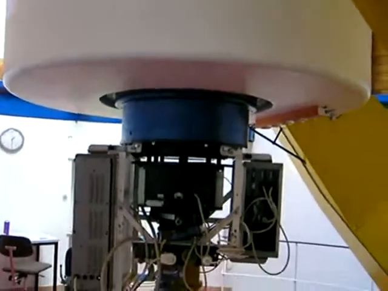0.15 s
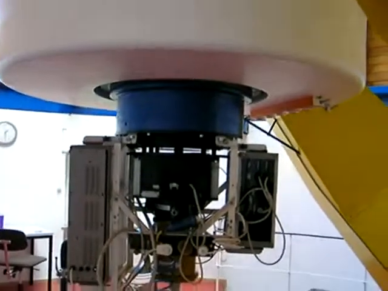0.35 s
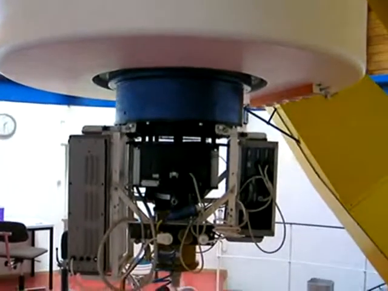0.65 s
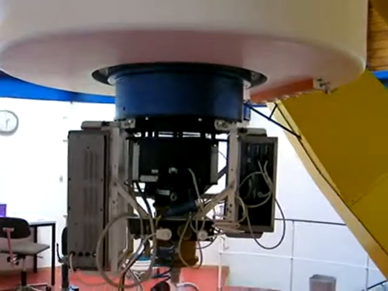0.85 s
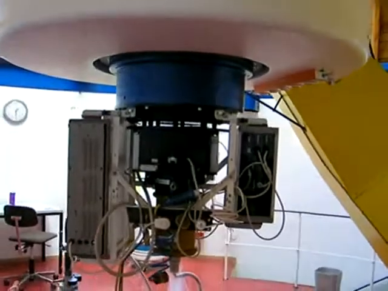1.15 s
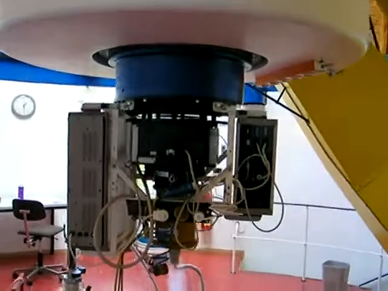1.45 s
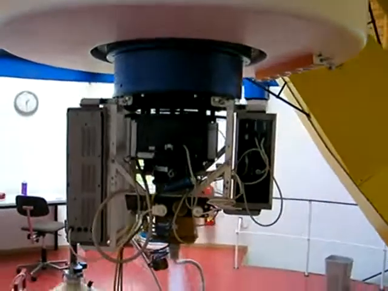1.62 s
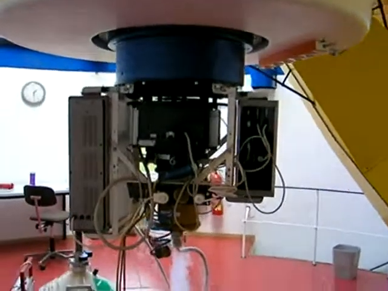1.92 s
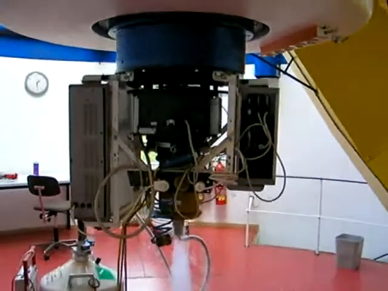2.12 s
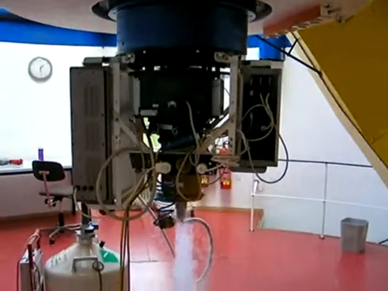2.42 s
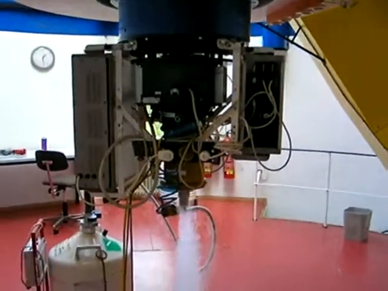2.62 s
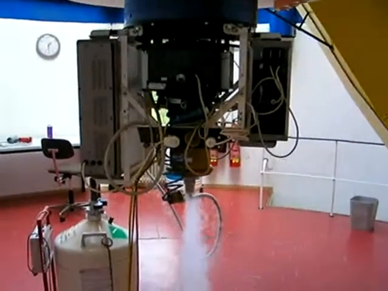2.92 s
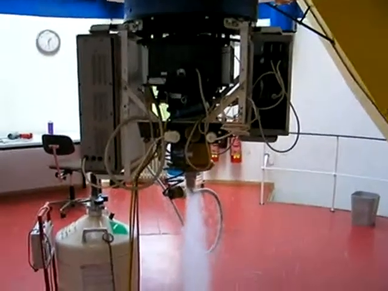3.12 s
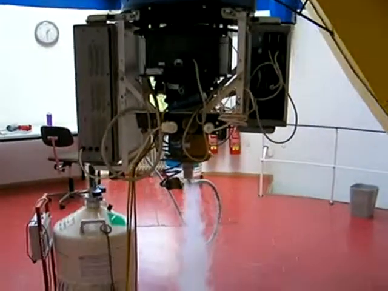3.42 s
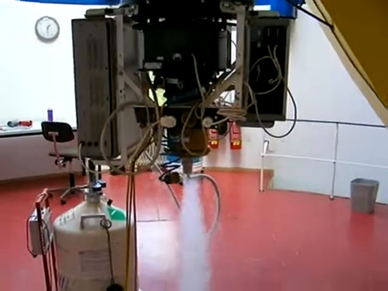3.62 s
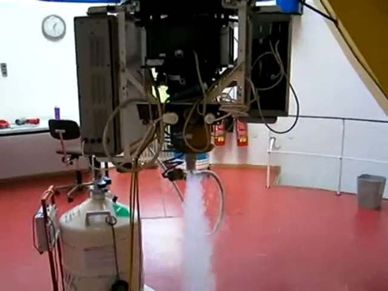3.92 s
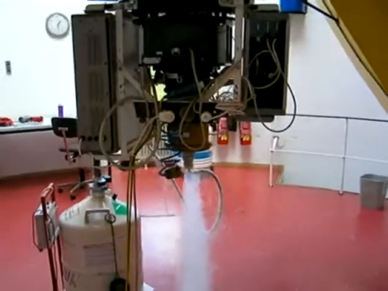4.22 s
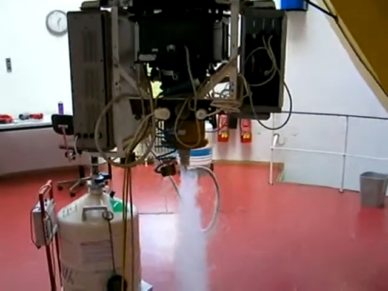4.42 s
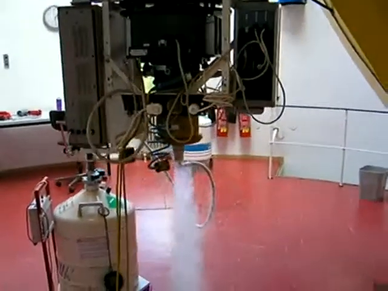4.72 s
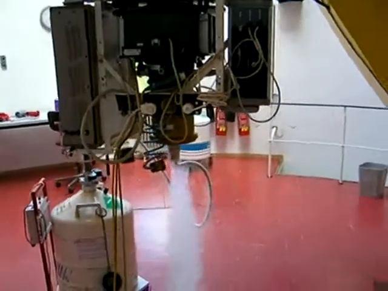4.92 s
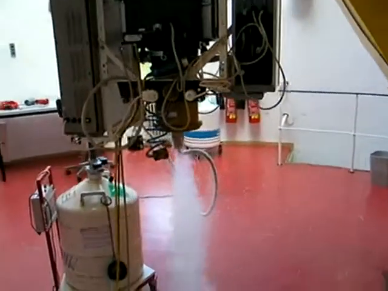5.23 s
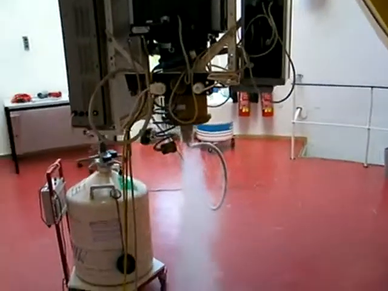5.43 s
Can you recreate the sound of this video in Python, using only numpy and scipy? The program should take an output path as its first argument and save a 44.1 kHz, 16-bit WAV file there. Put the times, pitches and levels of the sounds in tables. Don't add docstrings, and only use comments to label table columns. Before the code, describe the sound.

Constant turbulent vapour jet, mid-bright and slightly whistling, swelling and easing several times without stopping. Underneath are a faint low hum, motor whine and a quick regular pump knock that fades in and out as the microphone tilts. A short spray burst comes early and two soft handling bumps near the middle. Indoor hall, single microphone, identical channels, muffled treble with patchy holes.

```python
import sys
import numpy as np
from scipy import signal
from scipy.fft import irfft
from scipy.io import wavfile

SR = 44100
rng = np.random.default_rng(int(sys.argv[2]) if len(sys.argv) > 2 else 0)


def decibels_to_gain(level_db):
    exponent = np.asarray(level_db, float) / 20
    return 10 ** exponent


def master_out(mix):
    frames = np.transpose(np.atleast_2d(mix))
    ceiling = np.clip(frames, -1, 1)
    pcm = np.round(ceiling * 32767).astype(np.int16)
    wavfile.write(sys.argv[1], SR, pcm)


N = 245107

# [t/s, level/dB]
FLOW = [(0, -39), (.1, -34), (.21, -38.5), (.36, -31.5), (.65, -36.5), (.95, -31), (1.14, -38.5),
        (1.27, -34), (1.75, -38), (1.92, -32.5), (2.07, -40), (2.5, -31), (2.84, -35.5), (3.85, -34),
        (4.0, -38), (4.17, -32), (4.5, -34), (5.1, -34), ]
# [f/Hz, density/dB per Hz]
HISS_SPECTRUM = [(250, -9.5), (900, -3.5), (1900, -6), (2500, -0.5), (3300, -14.5), (4000, 7.5),
                 (4800, -19.5), (6000, -12)]
# [f/Hz, width/Hz, level/dB]
PIPE_MODES = [(769.6, 130, -43), (1736, 50, -50), (2046, 56, -49), (2696, 170, -43.5), (7880, 22, -66.5)]
# [f/Hz, level over flow/dB, share of flow swing, rise as the vent comes into view/dB per s]
WHISTLES = [(2306, -3.5, 0.94, -0.4), (2523, -5, 1.7, -0.67), (3035, -7.5, 0.038, 1.1)]
WHISTLE_WIDTHS_HZ = [105, 75, 95]
# [f/Hz, density/dB per Hz]
SPRAY_SPECTRUM = [(4000, -15.5), (5200, 4), (5800, 3.5), (6300, 10.5), (7600, 5), (8700, -0.5)]
# [order of stroke rate, level/dB rms]
PUMP_ORDERS = [(98, -47.5), (99, -55), (168, -59), (209, -52), (212, -52), (213, -49), (214, -48),
               (223, -49), (224, -53), (230, -54), (272, -55), (301, -56), (329, -55), (336, -54)]
# [t/s, level/dB]
FACING = [
    (0, -1),
    (1, -10),
    (1.6, 0),
    (2.5, 0),
    (3.5, 0.5),
    (4.1, -3),
    (4.6, 4),
    (5.56, -7),
]
# [order, lower side level/dB, centre level/dB, upper side level/dB]
FAN_ORDERS = [(4, -69, -44.5, -65), (6, -57, -72, -64), (7, -53, -74, -53), (8, -62, -75, -55),
              (9, -50, -72, -48), (12, -65, -67, -58), (16, -59, -69, -62)]
# [f/Hz, level/dB rms]
MOTOR_TONES = [(310.45, -61), (391.19, -58), (520.87, -51), (570.4, -53), (620.86, -51), (678.93, -62),
               (719, -60), (720.86, -60), (752.34, -53), (861.7, -57)]
# [t/s, peak level/dB]
HAND_BUMPS = [
    (2.48, -35),
    (3.01, -40),
]
# [f/Hz, step/dB]
STEP_SPECTRUM = [(250, -30), (400, -35), (1800, -25), (3400, -28), (4000, -31), (5750, -27.5), (6400, -30),
                 (8300, -30.5)]
BAND_EDGES = [4, 8, 12, 16, 20, 24, 30, 36, 44, 52, 62, 74, 90, 110, 134, 162, 196]

IN_STEP_S = 4.1


def rms_one(x):
    return x / np.sqrt(np.mean(x ** 2) + 1e-20)


def at_hz(points, hz):
    f_hz, db = np.array(points)[:, 0], np.array(points)[:, 1]
    return np.interp(np.log(hz), np.log(f_hz), db)


def in_time(rows):
    s, *columns = np.transpose(rows)
    return [np.interp(np.arange(N) / SR, s, c) for c in columns]


def drift(rate_hz):
    r = np.exp(-80 * np.pi * rate_hz / SR)
    draws = rng.standard_normal(N // 40 + 2002)
    slow = signal.lfilter([1], [1, -2 * r, r * r], draws)[2000:]
    return np.interp(np.arange(N) / 40, np.arange(len(slow)), rms_one(slow))


def resonant_noise(hz, width_hz):
    r = np.exp(-np.pi * width_hz / SR)
    section = [1, 0, -1, 1, -2 * r * np.cos(2 * np.pi * hz / SR), r * r]
    return rms_one(signal.sosfilt([section, section], rng.standard_normal(N)))


def banded_noise(spectrum, patchy_db, rate_hz):
    low_hz, high_hz = spectrum[0][0], spectrum[-1][0]
    edges = low_hz * 2 ** np.arange(0, np.log2(high_hz / low_hz) + .3, 1 / 3)
    white = rng.standard_normal((2, N))
    together = drift(rate_hz / 4)
    out = 0
    for k, (low, high) in enumerate(zip(edges, edges[1:])):
        bandpass = signal.butter(2, [low, high], "band", fs=SR, output="sos")
        band = signal.sosfilt(bandpass, white[k % 2])
        flicker_db = patchy_db * (0.39 * together + drift(rate_hz))
        out = out + decibels_to_gain(at_hz(spectrum, np.sqrt(low * high)) + flicker_db) * band
    return rms_one(out)


def whistle(hz, width_hz, order=2):
    low = signal.butter(order, width_hz / 2, fs=SR, output="sos")
    real, imaginary = signal.sosfilt(low, rng.standard_normal((2, N)))
    carrier = np.exp(2j * np.pi * np.cumsum(hz) / SR)
    return rms_one(np.real((real + 1j * imaginary) * carrier))


def tones(hz, db, turns):
    t = np.arange(N) / SR
    return sum(np.sqrt(2) * decibels_to_gain(d) * np.cos(2 * np.pi * (f * t + p)) for f, d, p in zip(hz, db, turns))


def spray():
    surge_s, attack_s, decay_s, surge_db = 1.85, .015, .13, 9.5
    t = np.arange(N) / SR
    surge = np.exp(np.where(t < surge_s, (t - surge_s) / attack_s, (surge_s - t) / decay_s))
    return decibels_to_gain(-47 + surge_db * surge) * banded_noise(SPRAY_SPECTRUM, patchy_db=.4, rate_hz=25.0)


def jet():
    wander_hz, flutter_db = 26, 1.5
    t = np.arange(N) / SR
    flow_db, = in_time(FLOW)
    swing_db = flow_db - flow_db.mean()
    out = decibels_to_gain(-35.5) * banded_noise(HISS_SPECTRUM, patchy_db=1.0, rate_hz=21.0)
    out += sum(decibels_to_gain(db) * resonant_noise(hz, width_hz) for hz, width_hz, db in PIPE_MODES)
    for (hz, db, follows, db_per_s), width_hz in zip(WHISTLES, WHISTLE_WIDTHS_HZ):
        level_db = flow_db.mean() + db + follows * swing_db + db_per_s * (t - t.mean())
        level_db = level_db + flutter_db * drift(4.7)
        out += decibels_to_gain(level_db) * whistle(hz + wander_hz * drift(1.5), width_hz)
    ridge_hz = 4228 + 25 * t
    out += decibels_to_gain(-46) * whistle(ridge_hz, width_hz=300, order=4)
    return out + spray()


def pump(facing_db):
    stroke_hz, stroke_s = 3.5367, .224
    casing_hz, casing_width_hz, casing_db, casing_scatter_db = 775, 110, -64, 3
    weak_level_db, weak_scatter_db = -75.5, 4
    strong, strong_db = np.transpose(PUMP_ORDERS)
    others = np.setdiff1d(np.arange(160, 340), strong)
    off = 2 * (others * stroke_hz - casing_hz) / casing_width_hz
    scatter_db = casing_scatter_db * rng.standard_normal(len(others))
    others_db = casing_db - 10 * np.log10(1 + off ** 2) + scatter_db
    order, db = np.append(strong, others), np.append(strong_db, others_db)
    smear = np.cumsum(.1 * rng.standard_normal(500))[order.astype(int)]
    hz = order * stroke_hz
    low = hz < 360
    hum = tones(hz[low], db[low], -hz[low] * IN_STEP_S)
    knock = tones(hz[~low], db[~low], (smear - hz * stroke_s)[~low])
    weak = np.zeros(N // 2 + 1, complex)
    bins = np.round(np.arange(105, 500) * stroke_hz * N / SR).astype(int)
    weak_db = weak_level_db + weak_scatter_db * np.minimum(rng.standard_normal(len(bins)), 1.5)
    weak[bins] = decibels_to_gain(weak_db) * np.exp(2j * np.pi * rng.random(len(bins)))
    return hum, decibels_to_gain(facing_db) * knock + irfft(weak, N) * N / np.sqrt(2)


def fans():
    blade_hz, wobble_hz = 86.93, 9.13
    weak_db, scatter_db = -64.5, 3.0
    order = np.arange(4, 21)
    db = weak_db + scatter_db * rng.standard_normal((3, len(order)))
    for strong, *strong_db in FAN_ORDERS:
        db[:, order == strong] = np.transpose([strong_db])
    hz = order * blade_hz + wobble_hz * np.array([[-1], [0], [1]])
    turns = rng.random(hz.shape)
    turns[1, 0] = -hz[1, 0] * IN_STEP_S
    hum = tones(hz[:, 0], db[:, 0], turns[:, 0])
    blades = tones(hz[:, 1:].ravel(), db[:, 1:].ravel(), turns[:, 1:].ravel())
    motor = tones(*np.transpose(MOTOR_TONES), rng.random(len(MOTOR_TONES)))
    return hum, blades + motor


def hall_hum(pump_hum, fan_hum):
    middle_s, peak_db, fall_db = 2.84, 0.96, 4.5
    t = np.arange(N) / SR
    return decibels_to_gain(peak_db - fall_db * (t / middle_s - 1) ** 2) * (pump_hum + fan_hum)


def rumble():
    low = signal.butter(2, 330, fs=SR, output="sos")
    noise = rms_one(signal.sosfilt(low, rng.standard_normal(N)))
    out = decibels_to_gain(-53.3 + 2.0 * drift(22.0)) * noise
    push = signal.windows.hann(round(0.008 * SR))
    for s, db in HAND_BUMPS:
        start = round(s * SR)
        out[start:start + len(push)] += decibels_to_gain(db) * push
    return signal.sosfilt(signal.butter(1, 18.0, "high", fs=SR, output="sos"), out)


def scene():
    facing_db, = in_time(FACING)
    pump_hum, knock = pump(facing_db)
    fan_hum, whine = fans()
    mono = jet() + knock + whine + hall_hum(pump_hum, fan_hum) + rumble()
    return np.tile(mono, (2, 1))


def coarse_rounding(x):
    hop, grid, top_hz = 576, 368, 8700
    spread_db, rounding = 1.5, .4
    count, frames = int(top_hz / SR * 2 * hop), N // hop + 3
    n, k = np.arange(2 * hop) + .5, np.arange(count) + .5
    window = np.sqrt(2 / hop) * np.sin(np.pi * n / 2 / hop)
    basis = window[:, None] * np.cos(np.pi / hop * np.outer(n + hop / 2, k))
    padded = np.pad(x, (hop + grid, (frames + 1) * hop - N - hop - grid))
    lines = np.lib.stride_tricks.sliding_window_view(padded, 2 * hop)[::hop][:frames] @ basis
    hz = k * SR / 2 / hop
    band = np.searchsorted(BAND_EDGES, k)
    draws = rng.standard_normal((frames // 2 + 1, band.max() + 2))
    draws = draws.repeat(2, axis=0)[:frames]
    jump = .6 * draws[:, -1:] + .8 * draws[:, band]
    step = decibels_to_gain(at_hz(STEP_SPECTRUM, hz) + spread_db * jump)
    rounded = np.sign(lines) * np.floor(np.abs(lines) / step + rounding) * step
    back = rounded @ basis.T
    out = np.zeros((frames + 1, hop))
    out[:-1] += back[:, :hop]
    out[1:] += back[:, hop:]
    return out.ravel()[hop + grid:hop + grid + N]


def band_limit(x):
    return signal.sosfilt(signal.butter(12, 8590, fs=SR, output="sos"), x)


def record(dry):
    mono = signal.sosfilt(signal.butter(9, 8000, fs=SR, output="sos"), dry[0])
    mono = coarse_rounding(mono)
    return band_limit(np.tile(mono, (2, 1)))


dry = scene()
out = record(dry)
master_out(out)
```